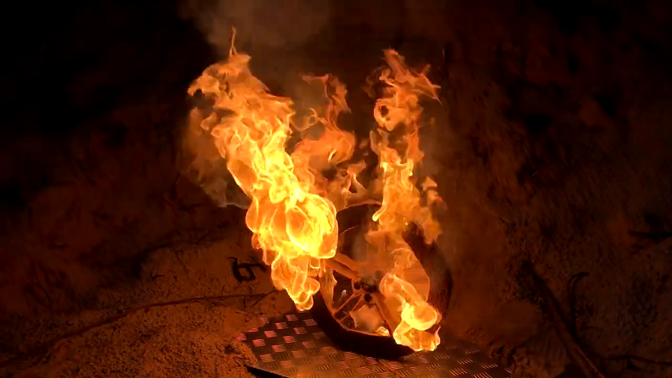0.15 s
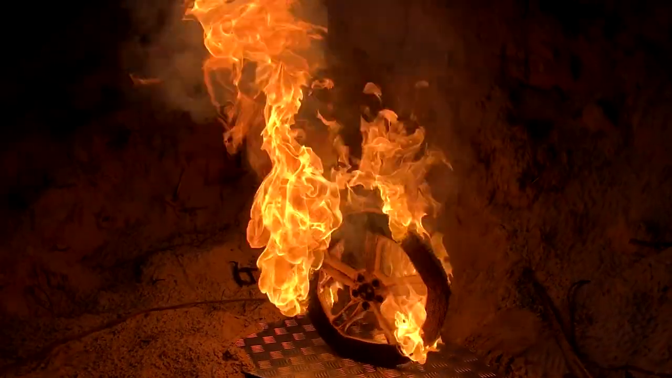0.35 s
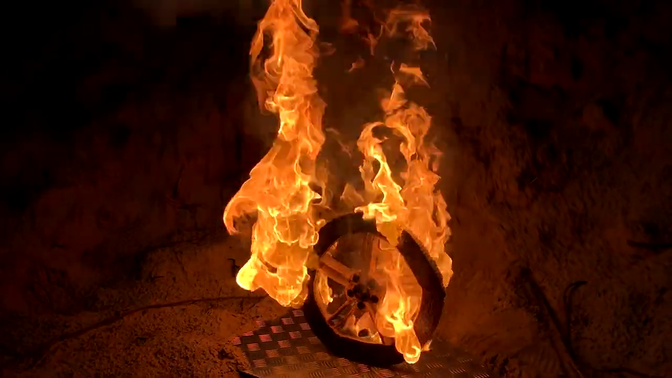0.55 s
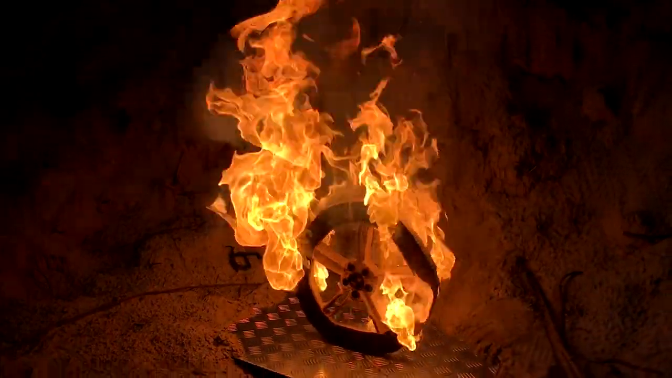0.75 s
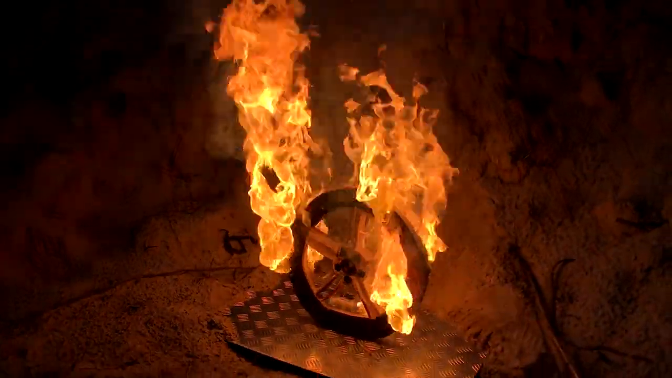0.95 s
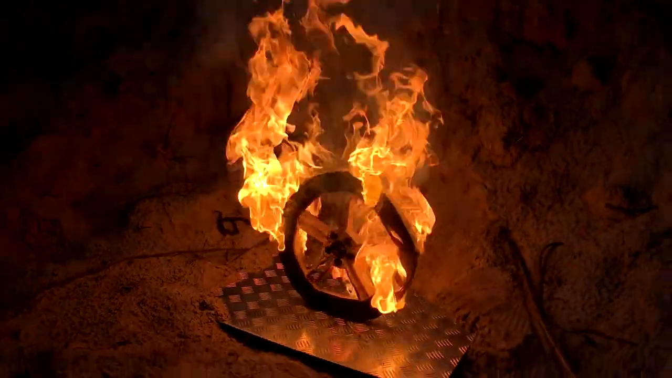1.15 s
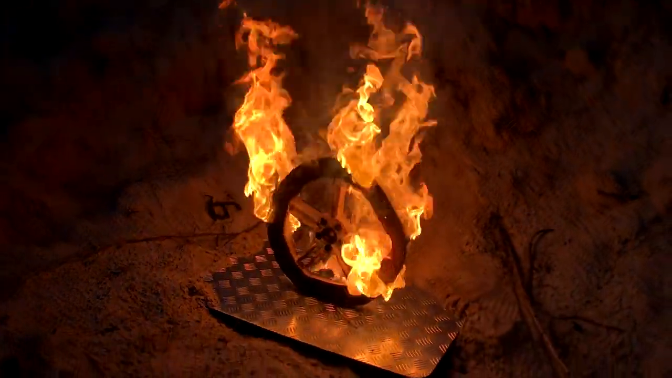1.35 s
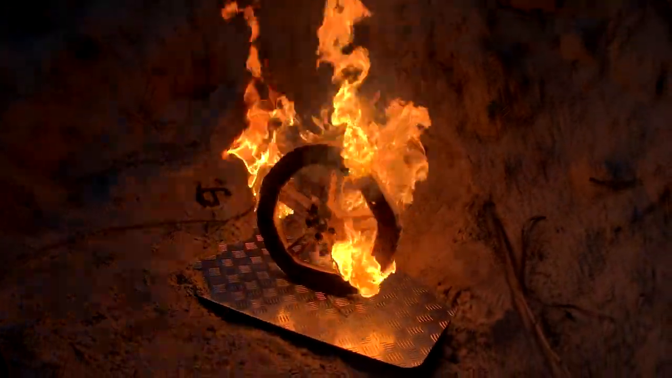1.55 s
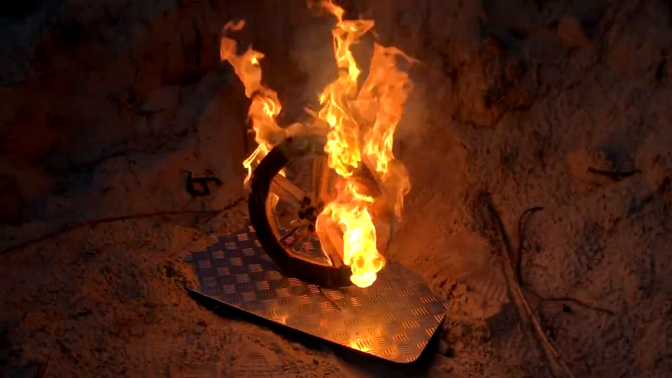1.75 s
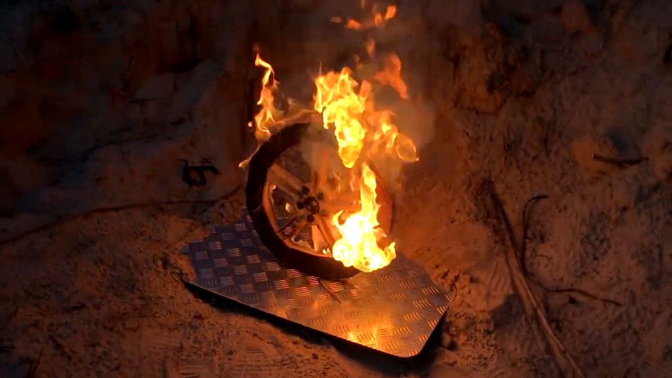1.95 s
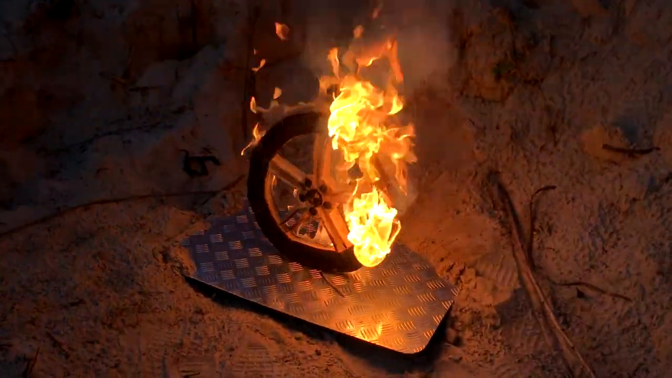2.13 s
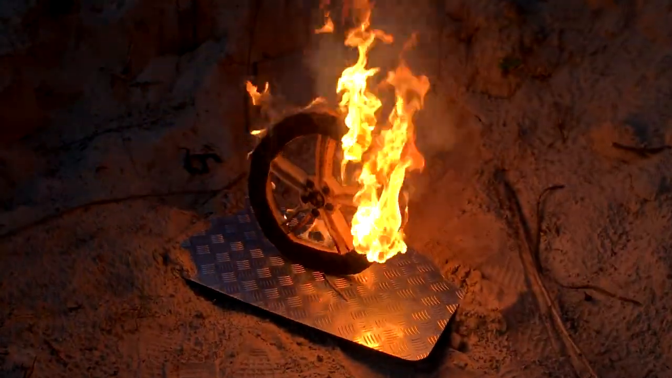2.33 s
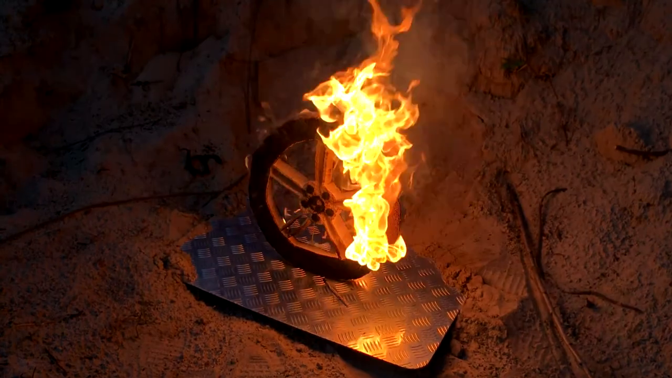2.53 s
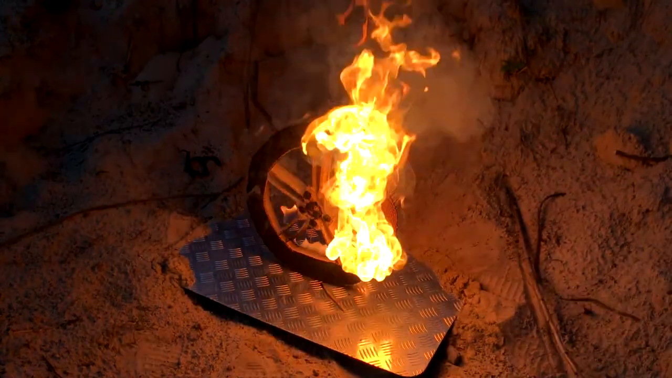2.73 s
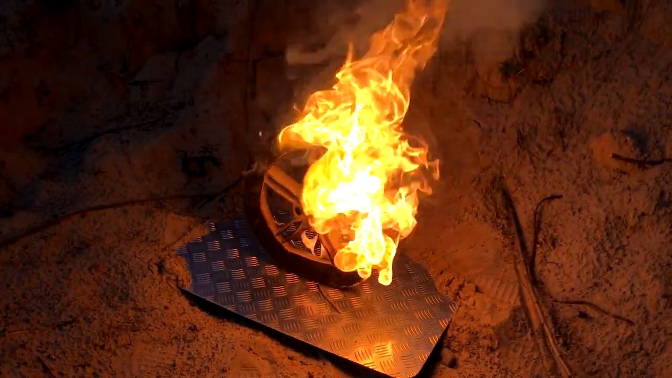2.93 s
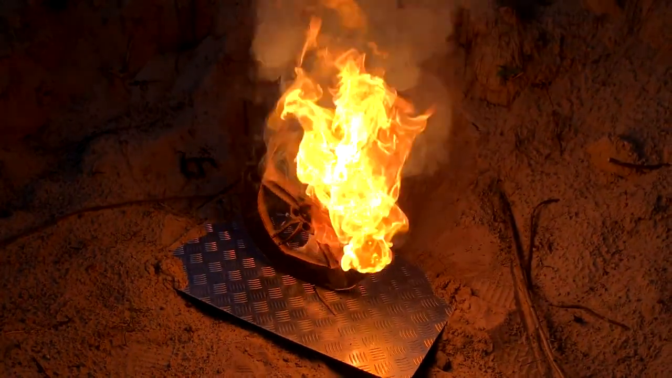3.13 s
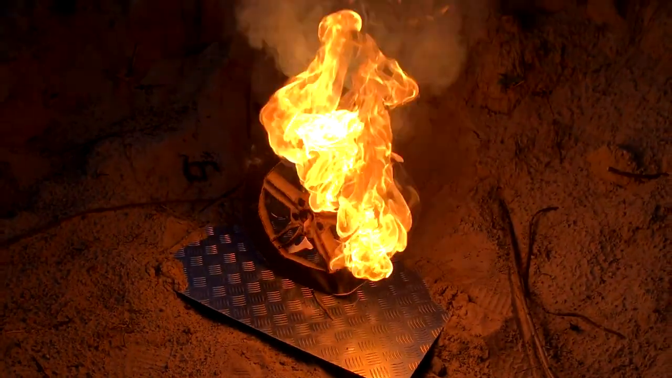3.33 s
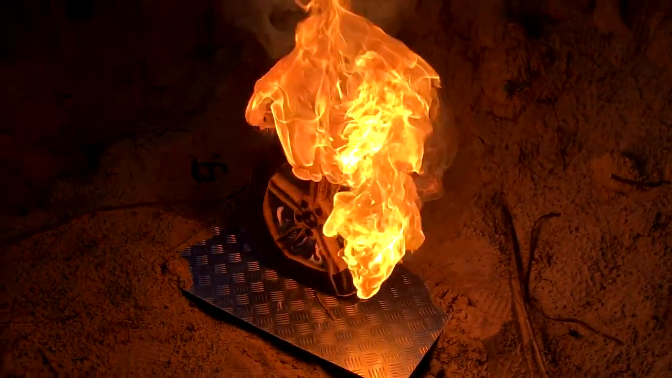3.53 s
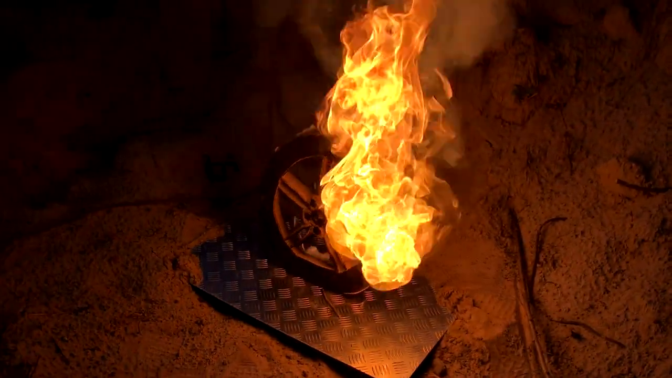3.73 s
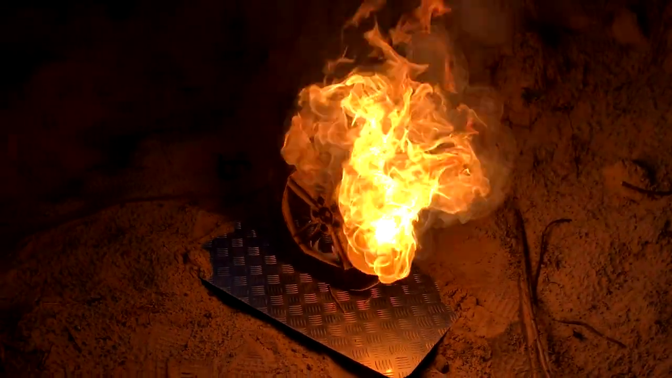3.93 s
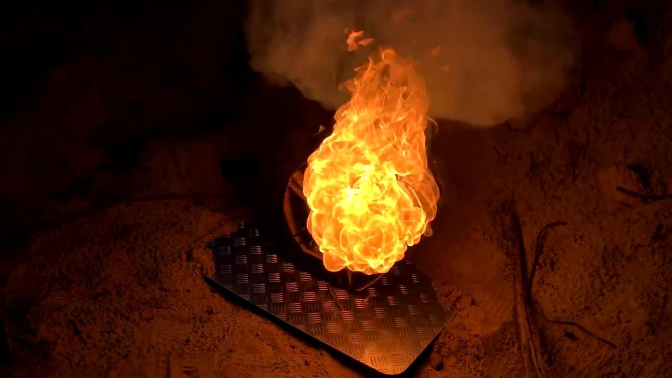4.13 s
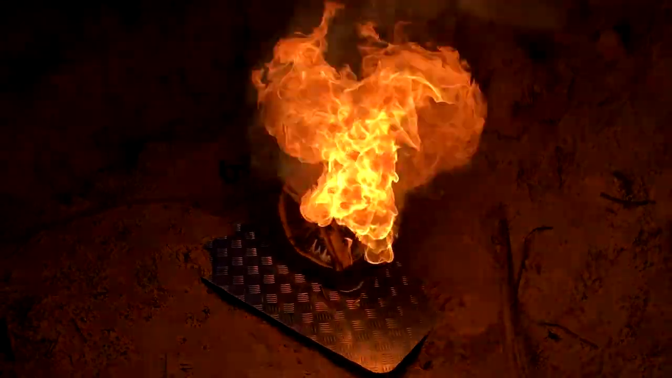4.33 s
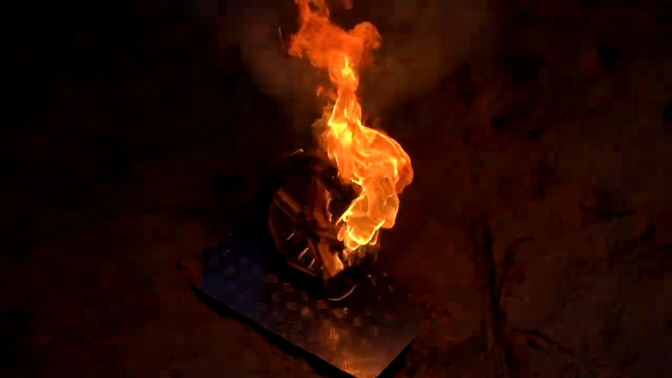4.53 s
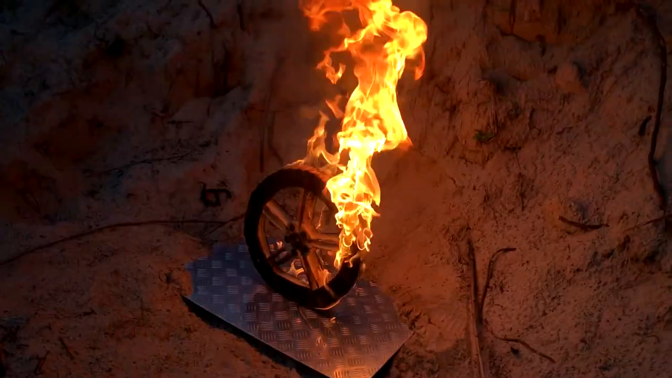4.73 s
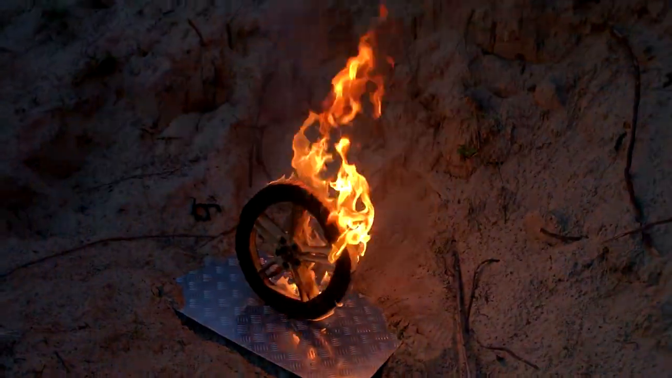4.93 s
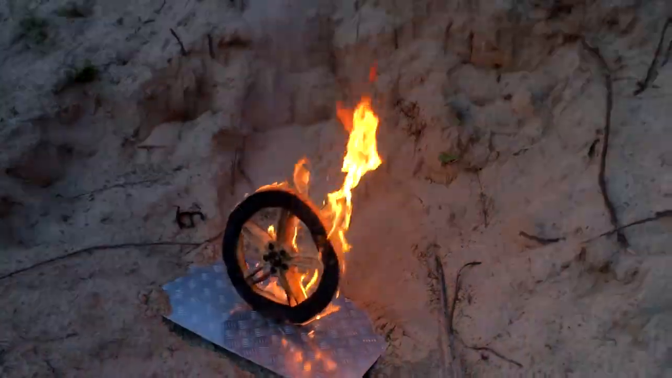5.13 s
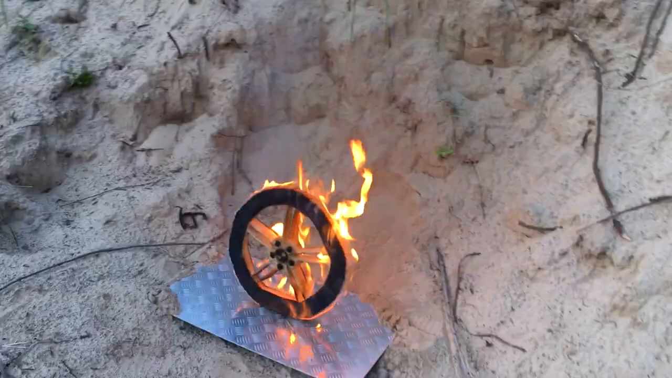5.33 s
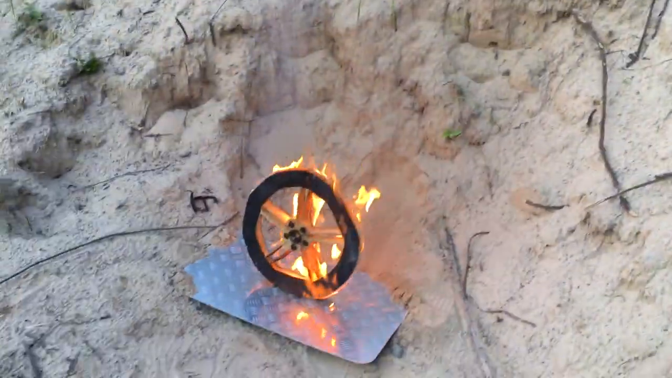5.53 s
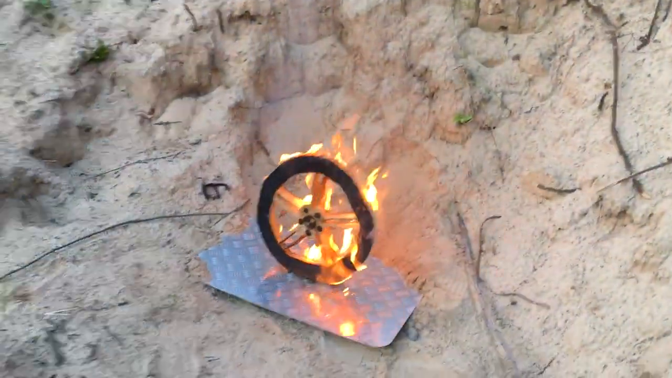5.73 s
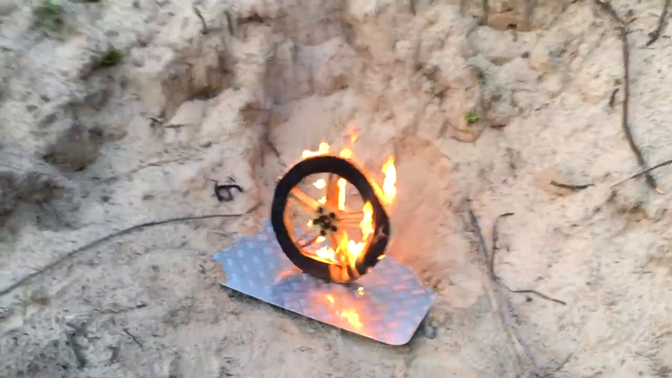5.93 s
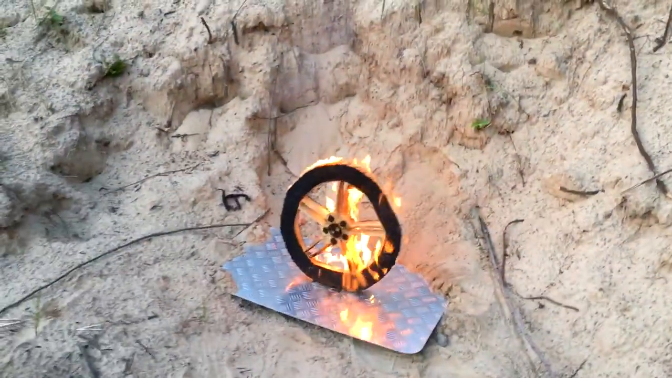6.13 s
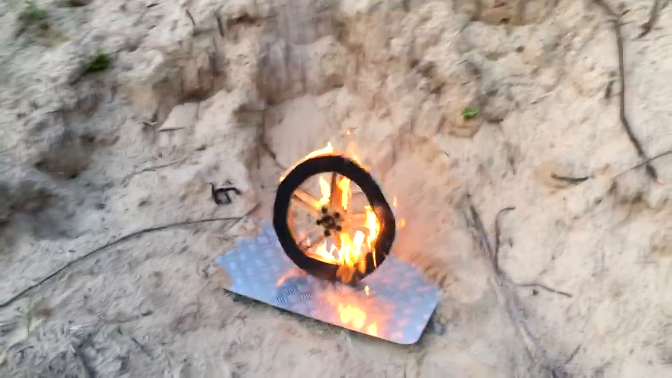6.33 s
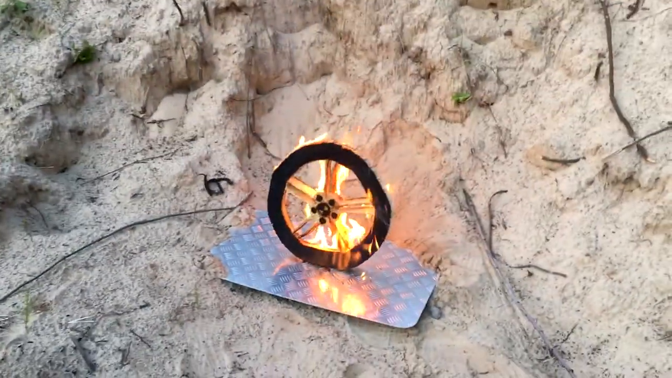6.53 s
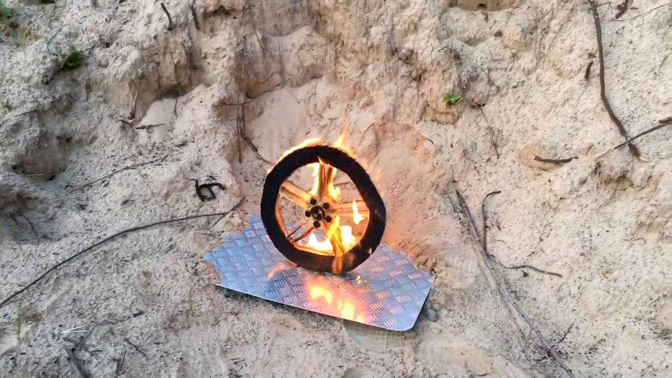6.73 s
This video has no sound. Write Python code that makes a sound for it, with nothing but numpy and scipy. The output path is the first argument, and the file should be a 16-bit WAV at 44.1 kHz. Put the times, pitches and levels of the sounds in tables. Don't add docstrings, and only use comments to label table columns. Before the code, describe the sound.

Massed match heads burn in a dense fizzing roar over fluttering low rumble, then collapse after four seconds into sparse dry crackles and faint hiss.

```python
import sys
import numpy as np
from scipy import signal
from scipy.fft import rfft, irfft, next_fast_len
from scipy.io import wavfile
from scipy.ndimage import uniform_filter1d, map_coordinates

SR = 44100
rng = np.random.default_rng(int(sys.argv[2]) if len(sys.argv) > 2 else 0)


def makeup_ratio(level_db):
    decades = np.asarray(level_db, float) / 20
    return 10 ** decades


def waveform_to_disk(signal):
    frames = np.transpose(np.atleast_2d(signal))
    scaled = np.clip(frames, -1, 1) * 32767
    samples = np.round(scaled).astype(np.int16)
    wavfile.write(sys.argv[1], SR, samples)


N = 298987

# pitch_hz, level_db
EMBER_COLOUR = [(240, -53), (400, 3), (730, 8), (1040, 0), (1780, -21), (3250, -17), (3790, -13),
                (4930, -32), (9270, -8), (10300, -6), (12200, -3), (14500, -1), (15900, -4)]
# time_s, level_db
SIDE_HISSES = [(.25, -54), (.785, -47), (1.063, -52), (1.69, -50), (3.083, -45), (3.268, -47), (3.385, -44),
               (3.455, -46), (3.99, -44), (4.058, -43), (4.15, -45), (6.496, -69), (6.612, -66)]
# pitch_hz, level_db
SIDE_HISS_COLOUR = [(4600, -6), (6200, 0), (7200, -9), (9500, -15), (15900, -15)]
# pitch_hz, width_hz, depth (0-1)
HOUSING_DIPS = [(5010, 140, 0.35), (10400, 320, 0.34)]
# start_s, peak_db
PLATE_PINGS = [
    (4.8614, -34),
    (4.9442, -33),
]
# pitch_hz, level_db, fade_s (time to fall 60 dB)
PLATE_TONES = [(5900, -13, .05), (9370, -5.5, 0.098), (12300, -1.5, 0.082), (12700, -8, .05),
               (15750, -7, .05)]
# start_s, energy_db, brightness (0 low - 2 high), narrowness_db (per part)
STICK_CRACKS = [(4.5243, -20, 1.0, 14.5), (4.7614, -23, 1.0, 11), (4.7986, -16, 1.35, 9),
                (4.8109, -22, 1.0, 13), (4.8956, -21, 1.95, 9), (4.9077, -11.5, 2.0, 28),
                (4.9558, -20, 1.4, 19), (5.0066, -20, 0.26, 10), (5.021, -22, .05, 8),
                (5.0244, -22, .05, 11), (5.0533, -11.5, .38, 15), (5.0672, -29, 1.95, 8.5),
                (5.1058, -29, 1.1, 6), (5.186, -28, 1.1, 3), (5.3661, -24.5, .8, 15),
                (5.3819, -25, 0.35, 7), (5.4106, -24, 1.5, 1), (5.5077, -7, 0.0082, 31),
                (5.5148, -25, .05, 14), (5.6934, -22.5, 1.4, 2), (5.83, -22.5, .47, 15),
                (6.0203, -23, 1.4, 14), (6.1788, -22.5, 1.5, 7), (6.2424, -24, 1.3, 7),
                (6.2737, -24, 2, 10), (6.3305, -23, 0.62, 15), (6.4399, -20, 1.5, 10),
                (6.5384, -18, 0.56, 13), (6.6737, -18.5, 1.6, 17), (6.7285, -23, 0.49, 21)]
# start_s, energy_db, brightness (0 low - 2 high)
MORE_CRACKS = [(4.8294, -27, .5), (4.9886, -33, 1.9), (5.0355, -32, 1.9), (5.045, -21, .3),
               (5.118, -27, .4), (5.2364, -27, .9), (5.2796, -26, .8), (5.2941, -32, 1.3),
               (5.5084, -25, 2.0), (5.5427, -26, .5), (5.7611, -23, .2), (5.815, -26, .7),
               (5.8568, -30, .05), (5.9738, -30, 1.3), (6.0367, -29, 1.2), (6.155, -29, .8),
               (6.2024, -31, 1.1), (6.3695, -32, 1.95), (6.3869, -26, 0.54), (6.5589, -31, 1.0),
               (6.6872, -30, 1.9), (6.7614, -28, 1.5)]
# pitch_hz, level_db
RUMBLE_COLOUR = [(8, -35), (15, -7.5), (28, -5.5), (40, -0.5), (49, 1), (62, -4.5), (78, -9.5), (97, -11),
                 (110, -20), (135, -22.5), (170, -50)]
# pitch_hz, level_db
FLUTTER_COLOUR = [(71, -17), (120, -2.5), (202, 2.5), (307, -10), (387, -6.5), (453, -16.5), (480, -16.5),
                  (620, -21.5), (1060, -120)]
# time_s,
# change_db
GAS_PUFFS = [(.05, 5.5), (.3, -1), (.43, -6), (.55, 5.5), (.67, -3), (.74, 4.5), (.91, -7), (1.07, 6),
             (1.64, 2), (1.69, -5.5), (1.77, 5.5), (1.84, -6), (2.0, 5.5), (2.38, -5), (2.53, 4.5),
             (2.62, -2), (3.14, 1.5), (3.25, 3.5), (3.44, 5), (3.7, 5), (3.79, -3), (3.93, 8.5), (4.2, 3),
             (4.33, 2), (5.12, 2), (5.27, -4), (5.5, 3), (6.01, 2.5), (6.5, 4), (6.56, -6)]
# pitch_hz, level_db
ROAR_COLOUR = [(260, -6), (450, -5.5), (535, -5), (625, -0.5), (882, -1), (1070, -1), (1690, -2.5),
               (1920, -2), (3200, -5), (4160, -20.5), (7040, -120)]
# pitch_hz, level_db
FIZZ_COLOUR = [(1820, -49), (3100, -9), (4160, -0.5), (4510, -3), (4970, -5), (5950, -3.5), (7800, -8),
               (10100, -18), (17200, -120)]
# pitch_hz, level_db
AIR_COLOUR = [(4530, -22), (7700, -7.5), (8590, -2), (10300, -6.5), (11400, -3.5), (13100, -5), (15100, -9),
              (15900, -11)]
# time_s, burning_db, jet_depth_db
BURNING = [(0, -35.5, 2), (.45, -38, 1.5), (.85, -38.5, 2.5), (1.25, -39.5, 1), (1.6, -40, 0),
           (2.2, -40, -1.5), (2.6, -39.5, 0.5), (2.9, -37, 0), (3.4, -37, -1.5), (4.05, -36.5, -1),
           (4.24, -38, -4), (4.4, -47.5, -1), (4.66, -54.5, 0.5), (4.95, -54, -0.5), (5.2, -58.5, 0.5),
           (5.75, -59.5, 3), (6.1, -63, 2), (6.78, -60.5, 3.5)]
# time_s, change_db, length_s
HEAD_FLARES = [(.13, 1.3, 0.077), (.26, 0.5, 0.028), (.33, 2.5, 0.019), (.58, 1.5, 0.074),
               (.67, -2.5, 0.046), (.91, 2, .015), (1.04, 0.5, 0.065), (1.33, 6, 0.0081),
               (1.55, -2.5, 0.028), (1.78, 5, 0.03), (1.9, -3, .015), (2.22, -1.5, 0.037), (2.45, 0.5, .06),
               (2.6, -2.5, 0.038), (2.82, 0.5, 0.041), (3.09, -1.5, 0.037), (3.41, 1.5, 0.041),
               (3.79, 3, 0.048), (3.84, -2.5, 0.045), (4.04, 0.5, 0.02), (4.385, 1, .015), (4.52, 7, 0.096),
               (4.6, 4, 0.012), (4.68, 2, .03), (4.78, 6, 0.03), (4.85, 3, .02), (5.34, 4, 0.024),
               (5.6, 1, 0.025), (5.7, 2.5, 0.023)]
# time_s, change_db, length_s
JET_SWINGS = [
    (.25, -1.5, .06),
    (.73, 4, .025),
    (1.04, 3, .03),
    (1.55, 1.5, .14),
    (1.78, -2.5, 0.034),
    (2.2, -2.5, .1),
    (2.75, -1.5, 0.18),
    (3.6, 1, 0.27),
    (4.31, 2, 0.033),
    (4.7, -3, .06),
]
# start_s, end_s, from_hz, to_hz, lift_db
SLIDING_ECHOES = [(-.5, 1.3, 1200, 1280, 4.5), (.3, 1.5, 1780, 1550, 5.5), (-.5, 1.5, 700, 750, -4),
                  (1.3, 3.1, 1900, 1500, 4.5), (1.9, 3.3, 820, 690, 3), (.7, 4.7, 460, 450, -4),
                  (3.25, 4.0, 1120, 980, 8), (3.0, 3.6, 2600, 1850, -6), (3.98, 4.4, 2000, 1250, 6),
                  (4.2, 5.0, 1150, 1120, 6), (4.3, 4.75, 1800, 1950, 5), (5.0, 6.0, 1180, 1080, 5),
                  (5.15, 5.95, 2450, 2350, 5), (6.2, 6.9, 1100, 1300, 5.5), (6.2, 6.7, 2500, 2600, 5),
                  (1.4, 4.9, 2950, 3300, -5), (3.5, 3.95, 1620, 1600, 3), (4.4, 4.95, 4300, 4200, -2.5),
                  (-.5, 1.2, 4200, 4150, 2.5), (3.7, 5.0, 360, 360, -4), (3.9, 4.35, 620, 600, 4),
                  (3.55, 3.8, 2400, 2100, 3), (3.6, 4.2, 1350, 1200, -4), (3.75, 4.05, 2200, 1900, -3.5)]

EMBERS_DB = -65
MORE_CRACKS_NARROW_DB = 14
SPLIT_MS, LONGEST_MS = 0.9, 1.8
SPLIT_GROWS, SPLIT_BRIGHT_DB = .3, -5.5
FULL_DB = -38
RUMBLE_DB, RUMBLE_GROWS = -35.5, 0.15
FLUTTER_DB, FLUTTER_GROWS = -46, 0.48
RUMBLE_LAG_S = 0.18
THROB_HZ, THROB_GROWS = 61.5, 0.13
PUFF_S, PUFF_FLUTTER = 0.026, 0.35
FLARE_ROAR, FLARE_AIR = 0.46, 1.26
AIR_DB, AIR_GROWS = -43, 1.12
SAP_DB = -66
DYING_SPUTTER = 0.034
ECHO_WIDTH_HZ = 135
TOP_HZ = 15770


def unit(x):
    return x / np.sqrt(np.mean(x ** 2) + 1e-20)


def along(points, hz):
    f, v = np.transpose(points)
    return np.interp(np.log(hz + 1), np.log(f + 1), v, left=-120, right=-120)


def curves(rows, t):
    s, *cols = np.transpose(rows)
    return [np.interp(t, s, c) for c in cols]


def swells(rows):
    t = np.arange(0, N / SR, .002)
    bumps = sum(db * np.exp(-.5 * ((t - s) / long) ** 2) for s, db, long in rows)
    return np.interp(np.arange(N) / SR, t, bumps)


def wobble(rate):
    knots = rng.standard_normal(int(N * rate / SR) + 4)
    return map_coordinates(knots, [np.arange(N) * rate / SR])


def filtered(x, response):
    m = next_fast_len(x.shape[-1] + min(x.shape[-1], 8192))
    return irfft(rfft(x, m) * response(np.fft.rfftfreq(m, 1 / SR)), m)[..., :x.shape[-1]]


def band(lo_hz, hi_hz):
    return lambda hz: 1 / np.sqrt((1 + (lo_hz / (hz + 1)) ** 6) * (1 + (hz / hi_hz) ** 16))


def echo_gain(hz, t):
    db = np.zeros((len(hz), len(t)))
    for start, end, from_hz, to_hz, lift_db in SLIDING_ECHOES:
        on = slice(*np.searchsorted(t, [start, end]))
        near = slice(*np.searchsorted(hz[:, 0], [from_hz / 3, from_hz * 2]))
        u = (t[on] - start) / (end - start)
        width = ECHO_WIDTH_HZ * np.sqrt(from_hz / 1000)
        centre = from_hz + (to_hz - from_hz) * u
        bump = np.exp(-.5 * ((hz[near] - centre) / width) ** 2)
        db[near, on] += lift_db * np.sqrt(abs(np.sin(np.pi * u))) * bump
    return makeup_ratio(db)


def jets(spectrum, patchy_db):
    hz, t, z = signal.stft(rng.standard_normal(N + 512), SR, nperseg=512)
    field = rng.standard_normal(z.shape)
    for _ in range(2):
        field = uniform_filter1d(field, size=5, axis=0)
        field = uniform_filter1d(field, size=11, axis=1)
    z = z * makeup_ratio(patchy_db * unit(field)) * echo_gain(hz[:, None], t)
    x = signal.istft(z, SR, nperseg=512)[1][:N]
    return unit(filtered(x, lambda hz: makeup_ratio(along(spectrum, hz))))


def side_hiss():
    gate, swell = np.zeros(N), np.hanning(2048)
    for s, db in SIDE_HISSES:
        gate[round(s * SR) - len(swell) // 2:][:len(swell)] += makeup_ratio(db - 1.5) * swell
    colour = lambda hz: makeup_ratio(along(SIDE_HISS_COLOUR, hz)) * (hz > 4600)
    noise = unit(filtered(rng.standard_normal(N), colour))
    return gate * noise * [[1], [-1]]


def embers():
    return makeup_ratio(EMBERS_DB + 0.7 * wobble(27)) * jets(EMBER_COLOUR, patchy_db=2.5)


def plate():
    out, t = np.zeros(N), np.arange(SR // 10) / SR
    for s, peak_db in PLATE_PINGS:
        ring = np.zeros(len(t))
        for hz, level, t60 in PLATE_TONES:
            fading = makeup_ratio(level + rng.normal(0, 2) - 60 * t / t60)
            ring += fading * np.sin(2 * np.pi * hz * t)
        out[round(s * SR):][:len(t)] += makeup_ratio(peak_db - 9) * ring * (1 - np.exp(-t / .001))
    return out


def ticks(count):
    when, pitch, size = rng.random((count, 3)).T
    hz, t = 2500 * 6.0 ** pitch[:, None], np.arange(48) / SR
    level = makeup_ratio(-55 - 4.7 * np.log(size + .03))[:, None]
    grains = level * np.sin(2 * np.pi * hz * t) * np.exp(-hz * t / 1.3)
    where = (when * N).astype(int)[:, None] + np.arange(len(t))
    return np.bincount(where.ravel(), grains.ravel(), N + len(t))[:N]


def cracks():
    out, t = np.zeros(N + SR), np.arange(512) / SR
    parts = [(band(600, 3700), .02), (band(4100, 10500), .55), (band(11300, 16800), .45)]
    splits = STICK_CRACKS + [(*row, MORE_CRACKS_NARROW_DB) for row in MORE_CRACKS]
    chance = rng.standard_normal((len(splits), len(parts), len(t)))
    for (s, energy_db, bright, narrow_db), noises in zip(splits, chance):
        longer_db = SPLIT_GROWS * (energy_db + 30) + SPLIT_BRIGHT_DB * (bright - 1)
        ms = min(LONGEST_MS, SPLIT_MS * makeup_ratio(longer_db))
        levels_db = energy_db - narrow_db * abs(np.arange(len(parts)) - bright)
        for (response, splinters), db, noise in zip(parts, levels_db, noises):
            tail = np.exp(-t / (0.00077 * max(ms, .2))) * (1 - np.exp(-t / .0001))
            burst = splinters * ms * noise * tail
            burst[4 + int(6 * abs(noise[0]))] += np.sign(noise[1])
            part = filtered(np.pad(burst, (64, 0)), response)
            out[round(s * SR) - 64:][:len(part)] += makeup_ratio(db) * part / np.linalg.norm(part)
    return out[:N]


def flame():
    t = np.arange(N) / SR
    blaze_db = curves(BURNING, t)[0] - FULL_DB
    size_db = curves(BURNING, t - RUMBLE_LAG_S)[0] - FULL_DB
    puff_db = swells([(s, db, PUFF_S) for s, db in GAS_PUFFS])
    rumble = unit(filtered(rng.standard_normal(N), lambda hz: makeup_ratio(along(RUMBLE_COLOUR, hz))))
    flutter = jets(FLUTTER_COLOUR, patchy_db=-0.5)
    flutter_db = FLUTTER_DB + FLUTTER_GROWS * blaze_db + PUFF_FLUTTER * puff_db
    throb = filtered(rumble, lambda hz: 1 / (1 + (THROB_HZ / (hz + 1)) ** 6))
    rumble = rumble - throb + makeup_ratio(2.5 + THROB_GROWS * size_db) * throb
    rumble_db = RUMBLE_DB + RUMBLE_GROWS * size_db + puff_db
    return makeup_ratio(rumble_db) * rumble + makeup_ratio(flutter_db + 0.51 * wobble(12)) * flutter


def heads():
    burn_db, depth_db = curves(BURNING, np.arange(N) / SR)
    flare_db = swells(HEAD_FLARES)
    roar_db = burn_db + depth_db + FLARE_ROAR * flare_db
    fizz_db = burn_db + flare_db
    air_db = AIR_DB + AIR_GROWS * (burn_db - FULL_DB) + FLARE_AIR * flare_db + swells(JET_SWINGS)
    sputter = 0.66 * wobble(18) + 1.1 * wobble(70) + 0.52 * wobble(300)
    sputter = sputter * (1 + DYING_SPUTTER * np.clip(FULL_DB - burn_db, 0, None))
    roar = makeup_ratio(roar_db + .5 * sputter) * jets(ROAR_COLOUR, patchy_db=1.0)
    fizz = makeup_ratio(fizz_db + 0.65 * sputter) * jets(FIZZ_COLOUR, patchy_db=1.42)
    air_level = (makeup_ratio(air_db) + makeup_ratio(SAP_DB)) * makeup_ratio(0.48 * sputter + 0.53 * wobble(150))
    air = air_level * jets(AIR_COLOUR, patchy_db=0.0)
    return roar + fizz + air


def scene():
    fire = embers() + plate() + ticks(count=700) + cracks() + flame() + heads()
    return np.array([fire, fire])


def roll_off(x):
    return signal.sosfilt(signal.butter(12, 16860, fs=SR, output="sos"), x)


def housing(hz):
    dips = [1 - np.clip(d, 0, 1) / (1 + (2 * (hz - c) / w) ** 2) for c, w, d in HOUSING_DIPS]
    return np.prod(dips, axis=0)


def record(dry):
    heard = filtered(dry + side_hiss(), lambda hz: housing(hz) * (hz < 16750))
    top = filtered(heard, lambda hz: hz >= TOP_HZ)
    quick, slow = (uniform_filter1d(top ** 2, size=n, axis=1) for n in (128, 8192))
    sharp = uniform_filter1d(1.0 * (quick > 30 * slow), size=128, axis=1)
    mix = heard - top * (1 - makeup_ratio(-4) * sharp)
    return roll_off(mix)


dry = scene()
out = record(dry)
waveform_to_disk(out)
```